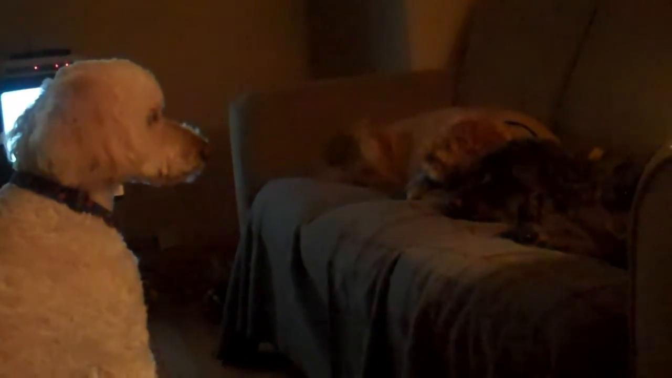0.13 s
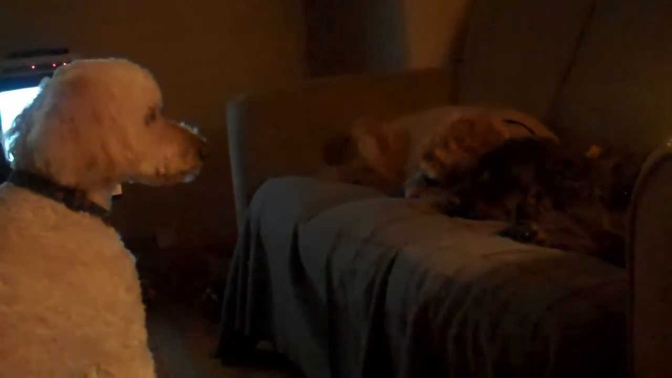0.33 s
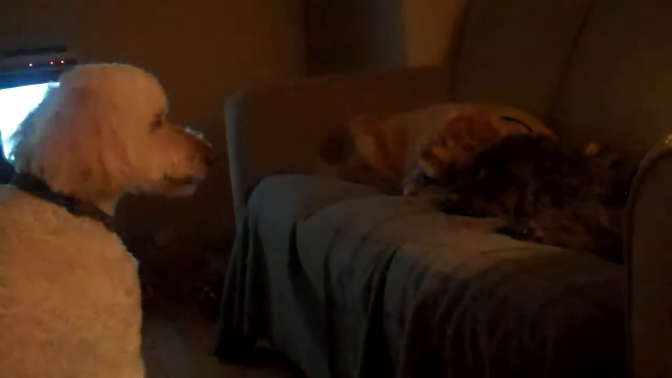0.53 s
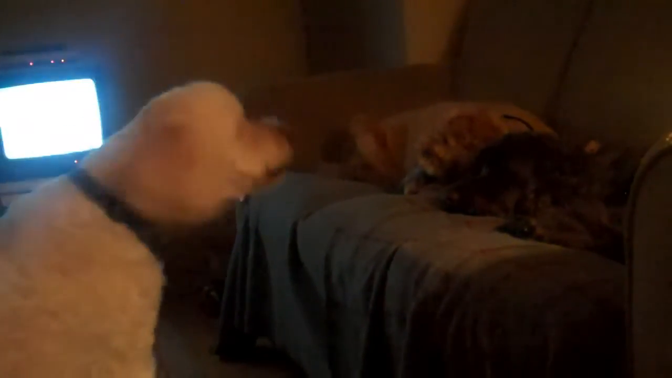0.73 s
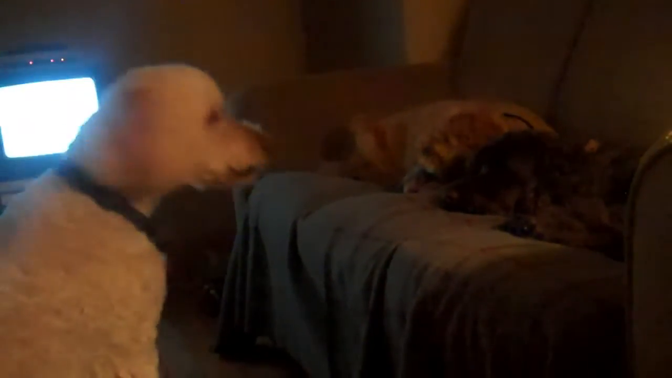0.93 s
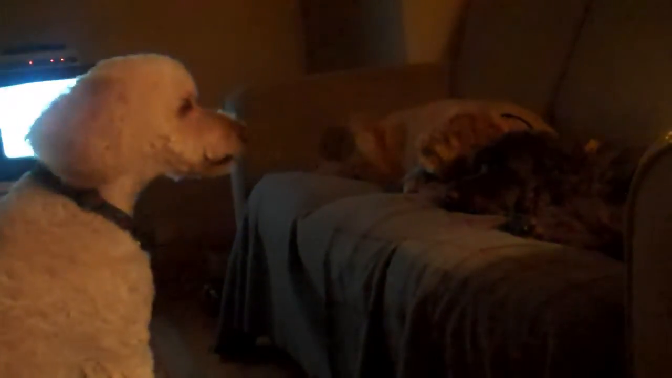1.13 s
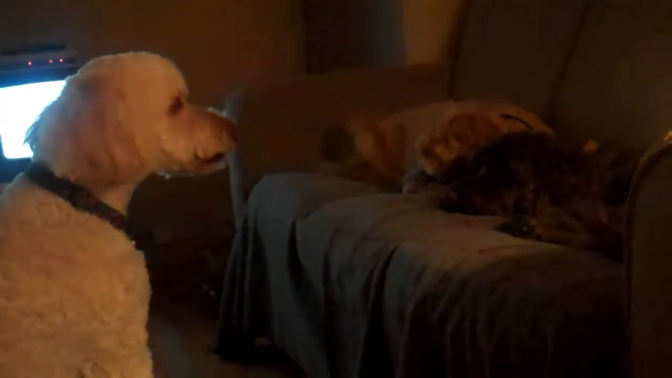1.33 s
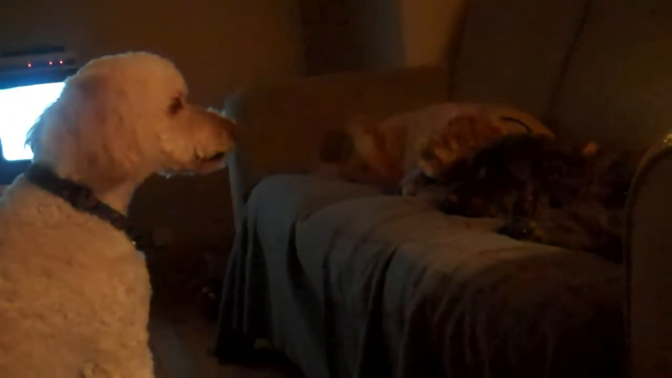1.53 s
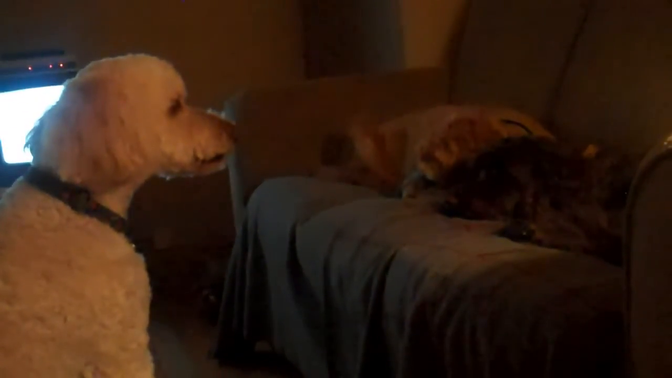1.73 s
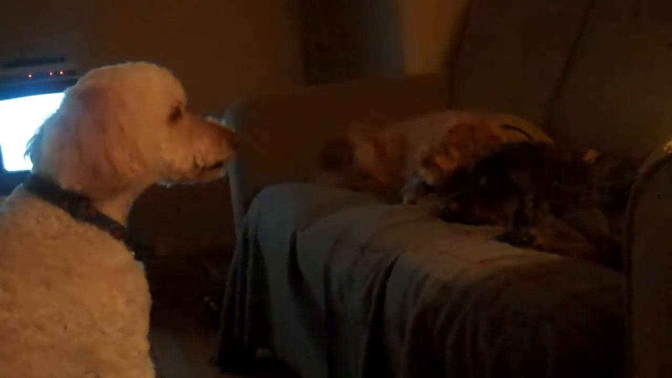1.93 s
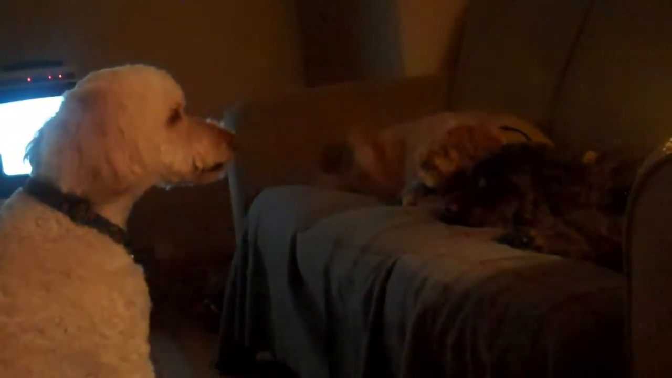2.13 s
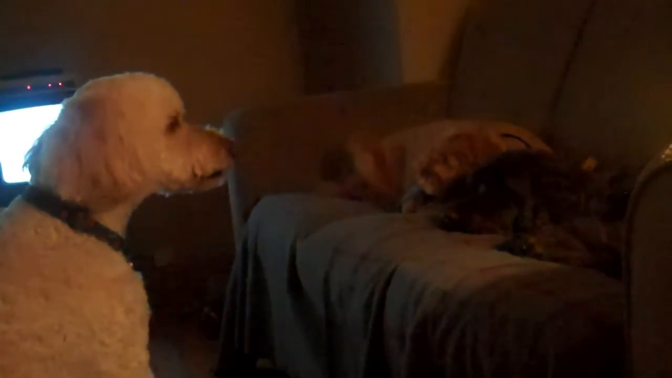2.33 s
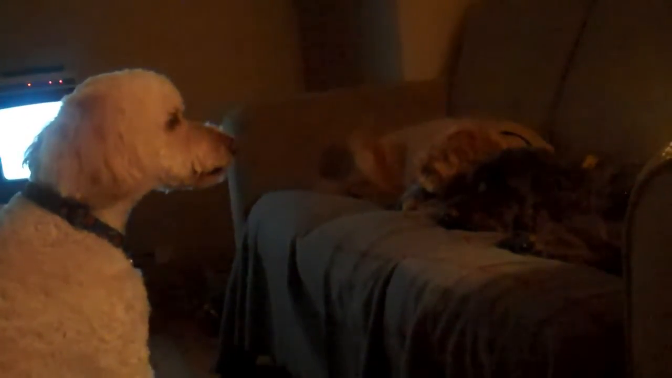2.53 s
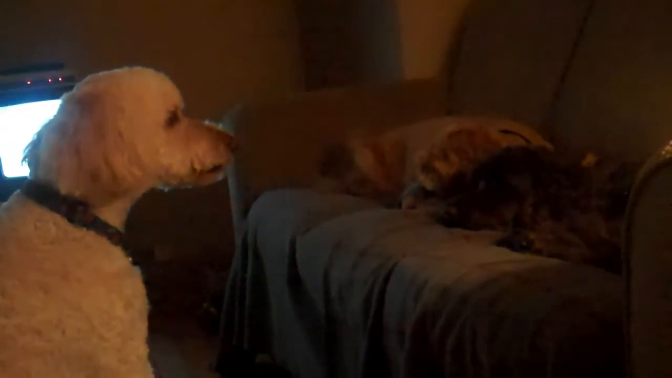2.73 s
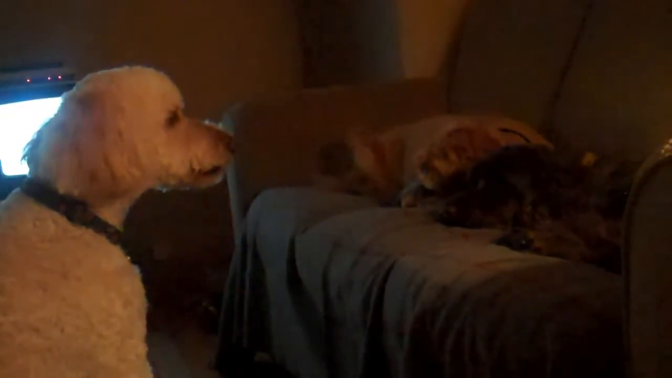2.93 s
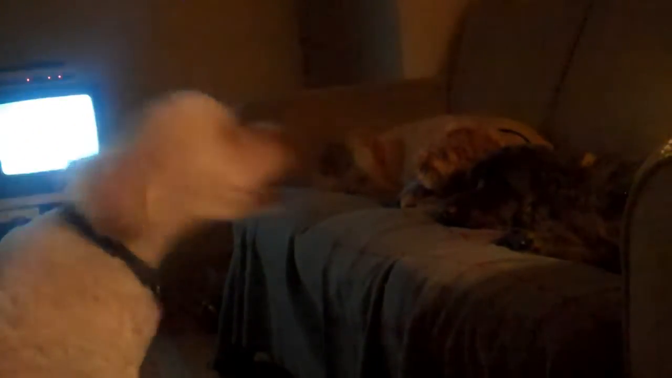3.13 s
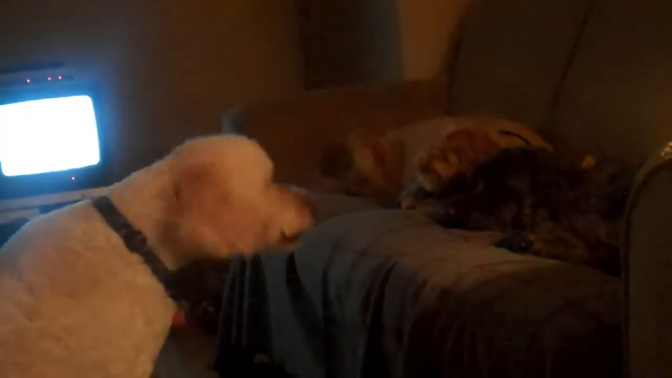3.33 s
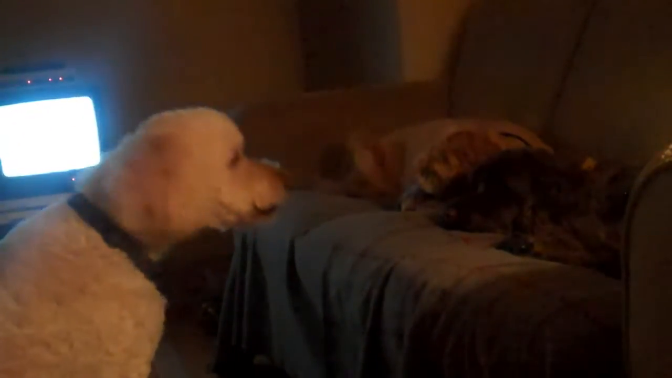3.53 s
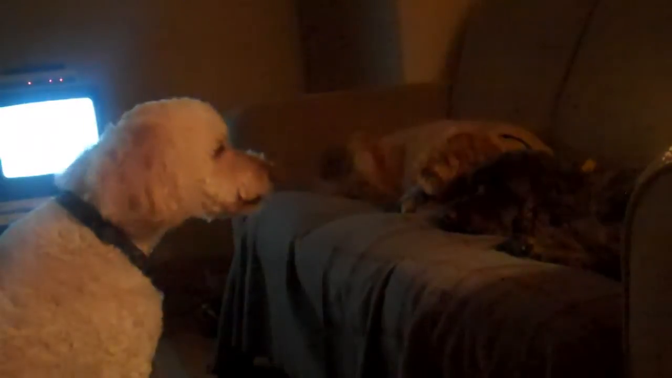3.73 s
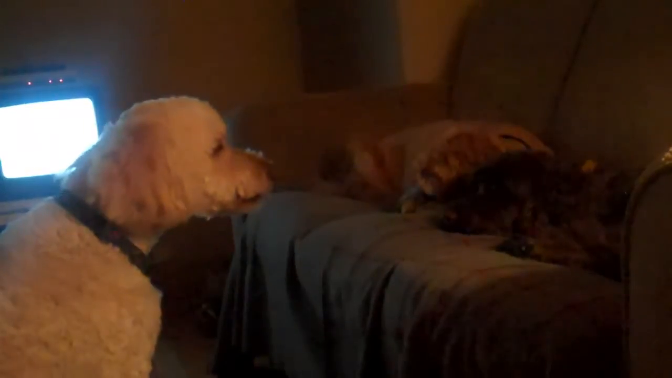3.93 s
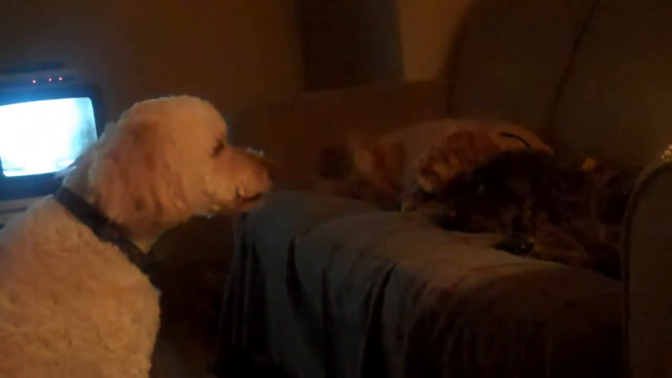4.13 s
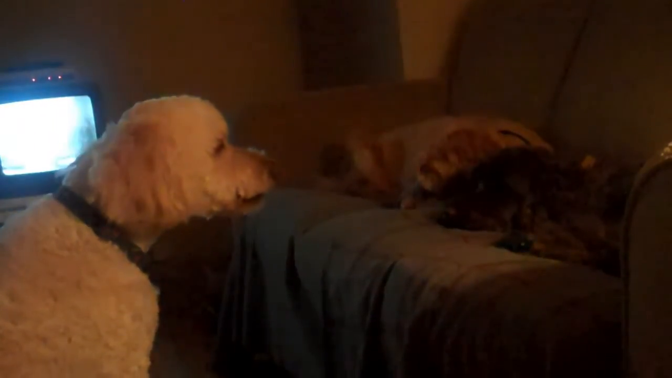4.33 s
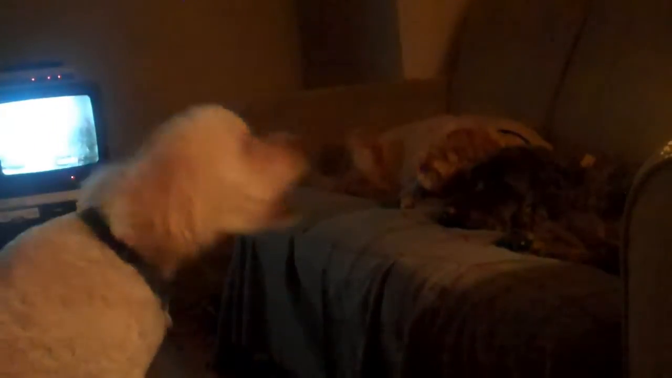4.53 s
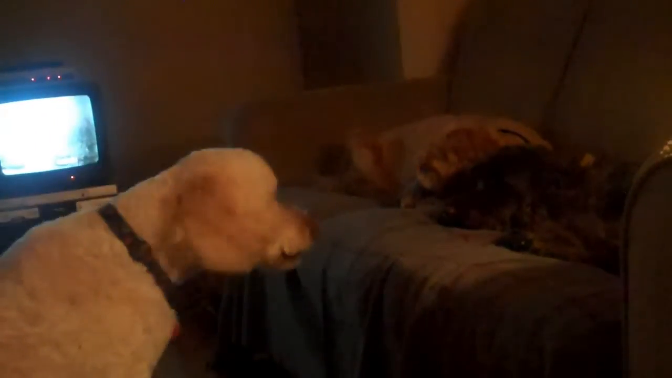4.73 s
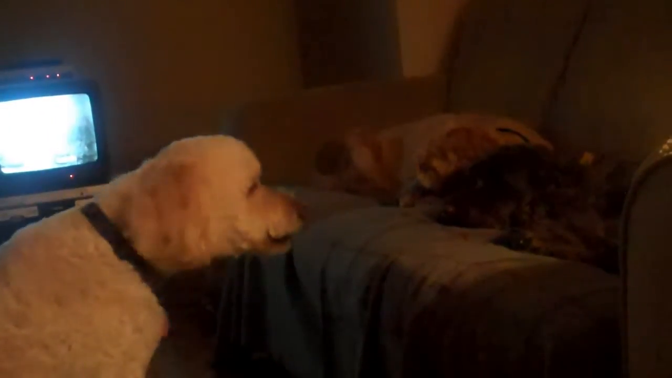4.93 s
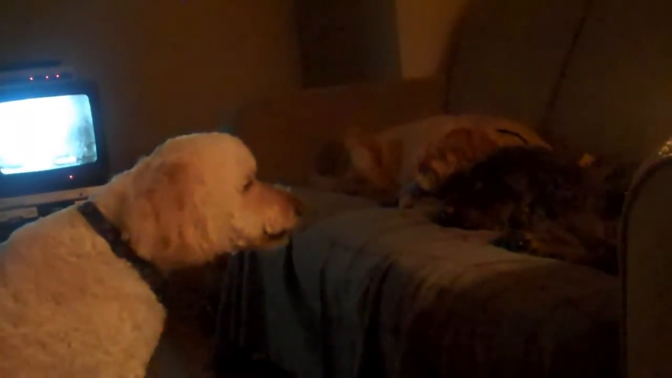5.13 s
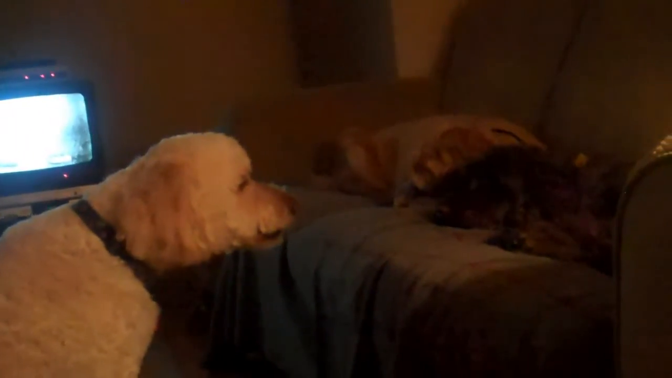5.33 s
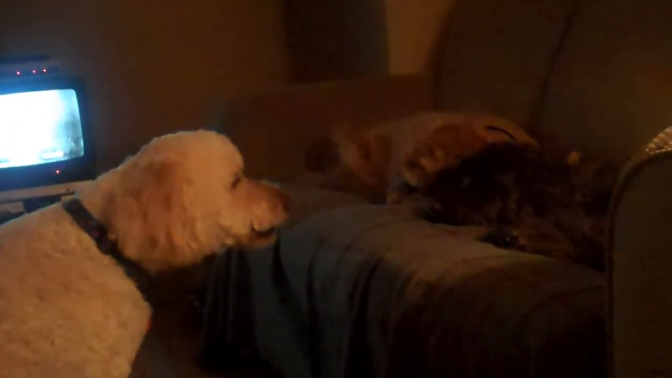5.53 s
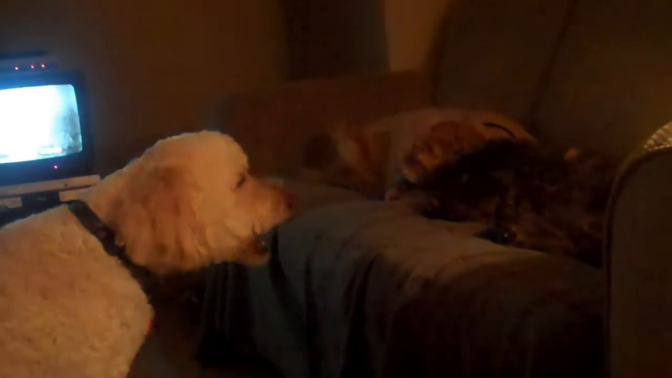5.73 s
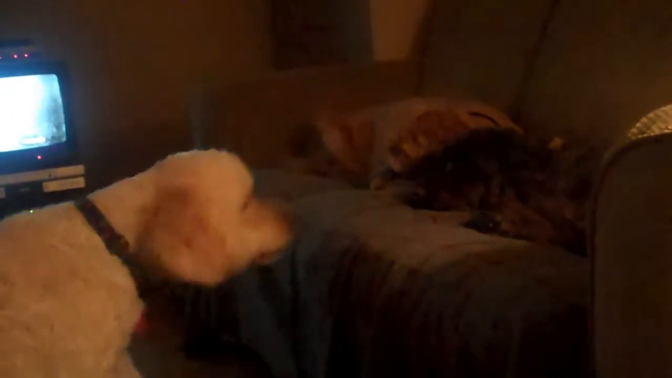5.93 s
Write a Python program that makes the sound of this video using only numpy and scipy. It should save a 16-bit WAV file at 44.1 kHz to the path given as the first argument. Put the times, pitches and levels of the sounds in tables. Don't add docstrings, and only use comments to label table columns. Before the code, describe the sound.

Four loud, close, overloaded dog barks spaced one to two and a half seconds apart, with whimpering tails, sniffs, tag clicks and faint hiss.

```python
import sys
import numpy as np
from scipy import signal
from scipy.fft import rfft, irfft, next_fast_len
from scipy.io import wavfile
from scipy.ndimage import uniform_filter1d, map_coordinates

SR = 44100
rng = np.random.default_rng(int(sys.argv[2]) if len(sys.argv) > 2 else 0)


def field_ratio(decibels):
    return 10 ** (np.asarray(decibels, dtype=float) / 20)


def log_audio(samples):
    frames = np.atleast_2d(samples).T
    limited = np.clip(frames, -1, 1)
    pcm = np.round(limited * 32767).astype(np.int16)
    wavfile.write(sys.argv[1], SR, pcm)


N = 268128


def unit(x):
    return x / np.sqrt(np.mean(x ** 2) + 1e-20)


def along(points, hz):
    f, v = np.transpose(points)
    return np.interp(np.log(hz + 1), np.log(f + 1), v)


def filtered(x, response):
    n = x.shape[-1]
    m = next_fast_len(n + SR // 4)
    return irfft(rfft(x, m) * response(np.fft.rfftfreq(m, 1 / SR)), m)[..., :n]


def tube(modes):
    def response(f):
        return sum((-1) ** k * field_ratio(db) * 1j * f * w / (c * c - f * f + 1j * f * w)
                   for k, (c, w, db) in enumerate(modes))
    return response


def span(rows):
    s, *cols = np.transpose(rows)
    start = round(s[0] * SR)
    t = np.arange(start, round(s[-1] * SR)) / SR
    return start, [np.interp(t, s, c) for c in cols]


def add(track, start, x):
    n = min(x.shape[-1], N - start)
    track[..., start:start + n] += x[..., :n]


def pair(x, alike, side):
    def turn(hz):
        return np.arccos(np.clip(along(alike, hz), -1, 1)) / 2

    mid, rest = filtered(x, lambda hz: np.array([np.cos(turn(hz)), np.sin(turn(hz))]))
    halves = np.array([[.5], [-.5]])
    return filtered(np.array([mid + rest, mid - rest]), lambda hz: field_ratio(along(side, hz) * halves))


def folds(rate_hz, rough, scatter_db, soft_hz, limp=0):
    chance = rng.standard_normal((3, SR // 2))
    cycles = .8 + np.cumsum(rate_hz) / SR
    jitter = .3 * rough * chance[0][cycles.astype(int)]
    cycles += np.cumsum(jitter * rate_hz) / SR
    count = cycles.astype(int)
    puffs = np.diff(count, prepend=0) * np.sqrt(SR / rate_hz)
    puffs = puffs * field_ratio(scatter_db * rough * chance[1][count])
    puffs = puffs * (1 + limp * np.cos(2 * np.pi * count / 3))
    hiss = chance[2][:len(count)] * np.sqrt(8 / 3) * np.sin(np.pi * cycles) ** 2
    share = np.clip(rough, 0, 1)

    def soft(hz):
        return 1 / (1 + (hz / soft_hz) ** 4)

    low = filtered(np.sqrt(1 - share) * puffs + np.sqrt(share) * hiss, soft)
    return low + filtered(hiss, lambda hz: 1 - soft(hz))


def throat(modes):
    def response(f):
        return sum((-1) ** k * field_ratio(db) * c * w / (c * c - f * f + 1j * f * w)
                   for k, (c, w, db) in enumerate(modes))
    return response


PEAK_DB = -5


def bark(s, rise, woof, yap_db, last_hz):
    slack_hz, woof_hz, break_hz = 150, 290.9, 376.5
    rough_woof, rough_yap = 0.19, .12
    parted, half, wide = .15, 0.34, 0.97
    top = s + rise
    broken = top + woof + .02
    yap_end = top + .088
    return [(s, slack_hz, -34.5, rough_woof, parted),
            (s + .52 * rise, slack_hz, PEAK_DB - 10, rough_woof, parted),
            (top, woof_hz, PEAK_DB, rough_woof, half),
            (top + woof, .9 * woof_hz, PEAK_DB - 6.5, rough_woof, 1.5 * half),
            (broken, break_hz, yap_db, rough_yap, wide),
            (yap_end - .018, break_hz, yap_db, rough_yap, wide),
            (yap_end, last_hz, yap_db - 3.5, rough_yap, wide),
            (yap_end + .07, last_hz, -67, 0, .5)]


# (start [s], rise [s], woof [s], yap level [dB], last pitch [Hz])
BARKS = [
    (.607, .033, .03, -18, 357.6),
    (3.09, .022, .044, -22, 466),
    (4.471, .037, .022, -17, 494.7),
    (5.752, .036, .034, -14.5, 480.7),
]
# (frequency [Hz], width [Hz], level [dB])
SHUT = [(165, 270, -11), (558.2, 125, 0.5), (1130, 360, -10), (1947, 360, -13), (2350, 630, -15),
        (3350, 330, -19.5), (4410, 490, -25), (5443, 810, -46), (7050, 740, -23.5)]
# (frequency [Hz], width [Hz], level [dB])
OPEN = [(456, 200, -1.5), (762.3, 540, -5), (1037, 72, 2), (1690, 500, -4.5), (2364, 570, -11),
        (5530, 610, -20.5), (7000, 1400, -36)]
# (frequency [Hz], level [dB])
GAPE = [(100, -46.5), (260, -20.5), (360, 1)]
# (frequency [Hz], level [dB])
LIPS = [(60, -20.5), (160, -9), (360, 1), (2550, -3.5), (2800, -11), (3300, -3), (4000, -7), (4800, -3.5),
        (7500, -8.5), (8500, 1), (15000, -28)]


def barks():
    out = np.zeros((2, N))
    limp, bloom_db, dull_hz = .55, 10, 856
    for row in BARKS:
        start, (pitch_hz, effort_db, rough, mouth) = span(bark(*row))
        rough = np.clip(rough, .03, .04 + pitch_hz / 3000)
        mouth = np.clip(mouth, 0, 1)
        source = folds(pitch_hz, rough, scatter_db=9.5, soft_hz=2750, limp=limp * (1 - mouth))
        source = source * field_ratio(effort_db + 22.5)
        hardest = np.maximum.accumulate(effort_db)
        bright = np.clip(2 + (hardest - PEAK_DB) / bloom_db, .12, 1)
        dull = filtered((1 - bright) * source, lambda hz: 1 / (1 + 1j * hz / dull_hz) ** 2)
        source = 2.0 * dull + bright * source
        shut, wide = (np.pad(share * source, (0, 2000)) for share in (1 - mouth, mouth))
        voice = filtered(shut, throat(SHUT))
        voice = voice + filtered(wide, lambda hz: throat(OPEN)(hz) * field_ratio(along(GAPE, hz)))
        voice = filtered(voice, lambda hz: field_ratio(along(LIPS, hz)))
        add(out, start, in_room(voice, wet_db=-8.0))
    return out


# (peak time [s], pitch [Hz], level [dB], level after the catch [dB])
WHINE = [
    (3.203, 445.9, -8, -19),
    (4.588, 482, -7.5, -18),
    (5.866, 453.4, -13.5, -20.5),
]


def whine():
    out = np.zeros((2, N))
    for s, hz, db, back_db in WHINE:
        back = s + 0.051
        start, (droop, level_db) = span([(s - .025, 0, db - 7.5), (s, 0, db), (s + 0.018, 0, db - 26.5),
                                         (back, 0, back_db), (back + .45, 1, back_db - 49.5)])
        knots = rng.standard_normal((2, 40))
        at = np.arange(len(droop)) * 36 / SR
        grown = np.clip(12 * droop, 0, 1)
        drift, flutter = (map_coordinates(k, [at]) * grown for k in knots)
        turn = 2 * np.pi * np.cumsum(hz * (1 - 0.017 * droop + 0.085 * drift)) / SR
        fade = np.clip(np.arange(len(turn)) / 900, 0, 1)
        tone = np.sin(turn) + field_ratio(-14.5) * np.sin(2 * turn)
        tone = fade * field_ratio(level_db + 3.5 * flutter) * tone
        add(out, start, in_room(tone, wet_db=-6.0))
    return out


# (frequency [Hz], width [Hz], level [dB])
CHEST = [(132, 38, 7), (414, 48, 3.5), (579, 64, 4.5), (953, 150, -6), (1740, 350, -7.5),
         (2680, 260, -16.5), (3950, 1300, -16)]


def growl():
    out = np.zeros((2, N))
    begin, surge, end = 5.5, 5.695, 5.755
    low_db, high_db = -51, -43
    start, (level_db,) = span([(begin, low_db - 13), (begin + 0.038, low_db), (surge, low_db),
                               (surge + 0.026, high_db), (end, high_db), (end + .012, -70)])
    flaps_hz = np.full(len(level_db), 38.0)
    source = folds(flaps_hz, np.full(len(flaps_hz), .3), scatter_db=6, soft_hz=1000)
    add(out, start, in_room(unit(filtered(source, tube(CHEST))) * field_ratio(level_db), wet_db=-5))
    return out


# (peak time [s], level [dB], held [s])
GASPS = [
    (.56, -52.5, .04),
    (3.07, -48, .012),
    (4.465, -63.5, .005),
]
# (frequency [Hz], width [Hz], level [dB])
GULLET = [(620, 200, -1), (950, 110, -1), (1400, 300, -10.5), (1780, 250, -2), (2640, 420, -14.5),
          (4300, 560, -14.5)]
# (start [s], end [s], frequency [Hz], width [Hz], level [dB])
SNIFFS = [(1.502, 1.58, 2530, 150, -68.5), (1.56, 1.637, 1827, 100, -65), (1.773, 2.03, 2710, 170.4, -63),
          (1.82, 1.917, 3180, 120, -62.5), (1.856, 2.007, 1781, 59.5, -69.5), (5.188, 5.272, 2560, 78, -66)]


def breath():
    dry = np.zeros(N)
    for s, db, held in GASPS:
        start, (level_db,) = span([(s - .07, db - 20), (s, db), (s + held, db - 4.5),
                                   (s + held + .012, db - 28)])
        air = rng.standard_normal(len(level_db))
        add(dry, start, field_ratio(level_db) * unit(filtered(air, tube(GULLET))))
    for begin, end, hz, width, db in SNIFFS:
        air = rng.standard_normal(round((end - begin) * SR))
        whistle = unit(filtered(air, lambda f: tube([(hz, width, 0)])(f) ** 2))
        add(dry, round(begin * SR), field_ratio(db) * np.hanning(len(air)) ** 0.1 * whistle)
    return in_room(dry, wet_db=-7)[:, :N]


# (time [s], peak level [dB], low disc level [dB], left over right [dB], clack frequency [Hz])
TAGS = [(0.9224, -49, -2, 8.5, 8100), (0.9932, -27, -32, 17, 7580), (1.0068, -37.5, -1, -2, 7700),
        (1.1426, -27.5, -5.5, 6.5, 7640), (3.4396, -51, 2, 0, 8100), (3.465, -26.5, -18, 3.5, 7570),
        (3.515, -46, -19, 14, 8000), (3.524, -46.5, -21, 25, 7900), (3.5416, -40.5, -4, 10, 7400),
        (4.8801, -36.5, -9, 9, 7500), (5.018, -35, -2.5, 6, 8120)]
# (frequency [Hz], 60 dB decay [s])
DISCS = [(5700, .012), (8100, 0.031), (13900, 0.014)]


def tags():
    out, t = np.zeros((2, N)), np.arange(SR // 8) / SR
    body = tube([(hz, 900, 0) for hz, _ in DISCS])
    for s, db, low_db, pan_db, clack_hz in TAGS:
        levels = [low_db + 1, -14, -13, 0] + rng.normal(0, 0.94, size=4)
        modes = list(DISCS) + [(clack_hz, .008)]
        ring = sum(field_ratio(level - 60 * t / t60) * np.sin(2 * np.pi * hz * t)
                   for (hz, t60), level in zip(modes, levels))
        crack = filtered(0.54 * field_ratio(-60 * t / 0.0027) * rng.standard_normal(len(t)), body)
        sides = field_ratio(db - 2.5 + pan_db * np.array([[.5], [-.5]]))
        add(out, round(s * SR), sides * in_room(ring + crack, wet_db=-7))
    peak, slide_db = 3.55, -52.5
    start, (level_db,) = span([(peak - .09, slide_db - 22), (peak, slide_db), (peak + 0.21, slide_db - 22)])
    noise = rng.standard_normal((2, len(level_db)))
    scrape = filtered(noise, lambda f: tube([(7750, 900, 0)])(f) ** 2)
    add(out, start, field_ratio(level_db) * unit(scrape) * field_ratio([[3], [-3]]))
    return out


# (frequency [Hz], 60 dB decay [s])
ROOM = [(100, 0.55), (250, 0.26), (480, 0.65), (750, 0.26), (1070, 0.81), (2000, 0.59), (3500, 0.42),
        (5400, .55), (8000, 0.46), (14000, 0.15)]
# (frequency [Hz], likeness [-1 to 1])
ROOM_ALIKE = [(60, 0.25), (180, 0.043), (550, 1), (1650, 0.42), (4970, 0.64), (15000, 0.1)]
# (frequency [Hz], left over right [dB])
ROOM_SIDE = [(60, -1.5), (180, -2), (550, 0.5), (1650, 0), (4970, -8.5), (15000, 6.5)]


def in_room(x, wet_db):
    hz, t, z = signal.stft(rng.standard_normal((2, SR)), SR, nperseg=256)
    tail = signal.istft(z * field_ratio(-60 * t / along(ROOM, hz)[:, None]), SR, nperseg=256)[1]
    tail = pair(np.pad(tail, ((0, 0), (200, 0))), ROOM_ALIKE, ROOM_SIDE)
    tail = field_ratio(wet_db) * tail / np.linalg.norm(tail[0])
    tail[:, 0] += 1
    return signal.fftconvolve(np.atleast_2d(x), tail, axes=1)


# (frequency [Hz], density [dB])
HUSH = [(12, -43.5), (25, -15.5), (50, -9), (90, -14.5), (185, -9), (245, -11.5), (790, -9.5),
        (1400, -11.5), (4000, -17.5), (14100, -24), (14400, -62)]
# (frequency [Hz], likeness [-1 to 1])
HUSH_ALIKE = [(60, 0.25), (180, 0.63), (550, 0.18), (1650, 0.13), (4970, -0.041), (15000, -0.44)]
# (frequency [Hz], left over right [dB])
HUSH_SIDE = [(60, -3.5), (180, 7), (550, 7.5), (1650, 3), (4970, 2), (15000, 1.5)]
# (frequency [Hz], width [Hz], level [dB])
HUM = [(120, 9.9, -69.5)]


def hush(loud):
    z = signal.stft(rng.standard_normal((2, N)), nperseg=512)[2]
    patches = uniform_filter1d(rng.standard_normal(z.shape[1:]), 6, 0)
    patches = uniform_filter1d(patches, 14, 1)
    air = signal.istft(z * field_ratio(.8 * unit(patches)), nperseg=512)[1][:, :N]
    air = pair(filtered(air, lambda hz: field_ratio(along(HUSH, hz))), HUSH_ALIKE, HUSH_SIDE)
    air = field_ratio(-60.5) * air / np.std(air.mean(0))
    power = np.abs(uniform_filter1d(loud[1] ** 2, 1500))
    masked = power / (power + field_ratio(-82.5))
    air -= masked * .8 * filtered(air, lambda hz: hz > 8500)
    (hz, width, db), = HUM
    drift = unit(filtered(rng.standard_normal(N), tube([(hz, width, 0)])))
    return air + field_ratio(db) * (np.sin(2 * np.pi * hz * np.arange(N) / SR) + .3 * drift)


def scene():
    voice = barks() + whine()
    return voice + growl() + breath() + tags() + hush(voice)


def top_cut(x):
    return signal.sosfilt(signal.butter(12, 15640, fs=SR, output="sos"), x)


def record(dry):
    flat = dry / (1 + np.abs(dry) ** 16) ** (1 / 16)
    climbing = np.gradient(uniform_filter1d(dry[0], size=13)) > .004
    flat[0] = np.where((dry[0] > 1.1) & climbing, -.92, flat[0])
    flat[1] = np.roll(flat[1], 1)
    treble = [(11000, -1.0), (14300, -2.5), (15600, -20)]  # (frequency [Hz], level [dB])
    mix = filtered(flat, lambda hz: field_ratio(along(treble, hz)))
    return top_cut(mix)


dry = scene()
out = record(dry)
log_audio(out)
```